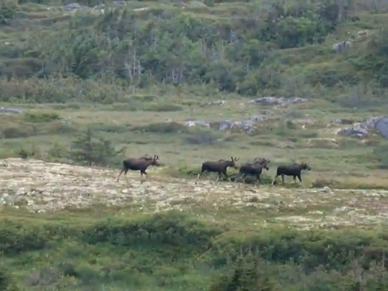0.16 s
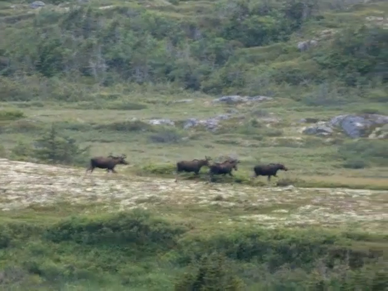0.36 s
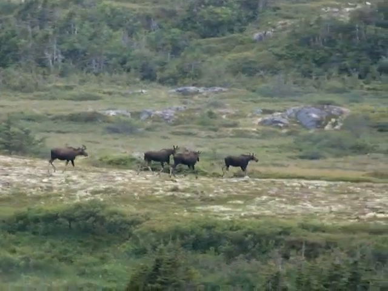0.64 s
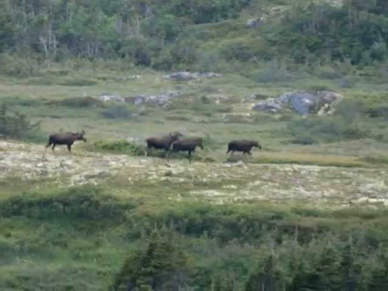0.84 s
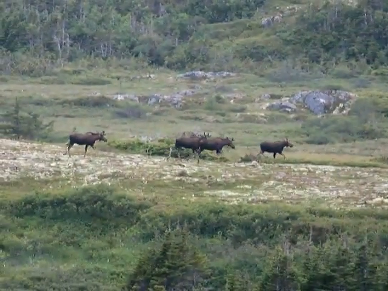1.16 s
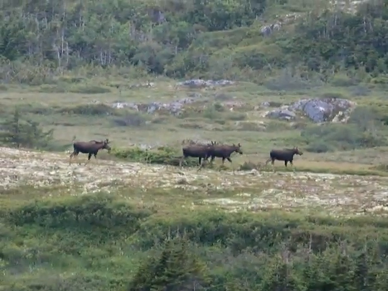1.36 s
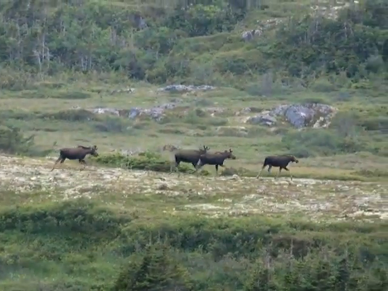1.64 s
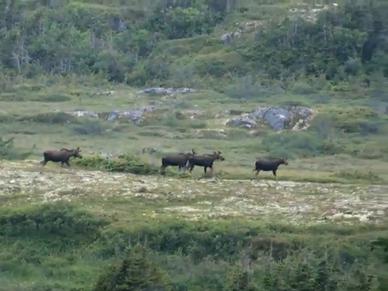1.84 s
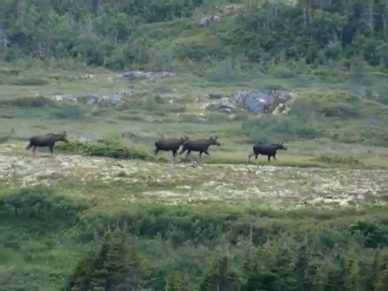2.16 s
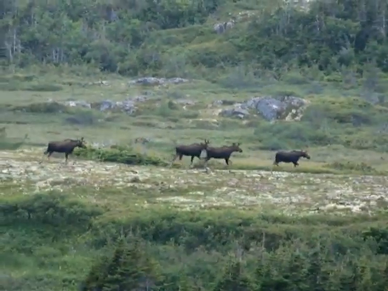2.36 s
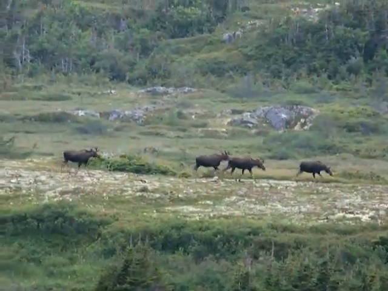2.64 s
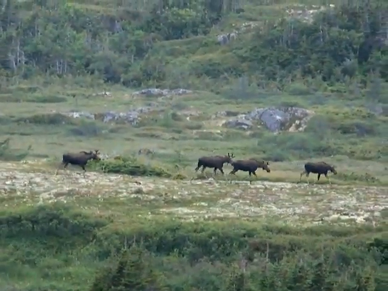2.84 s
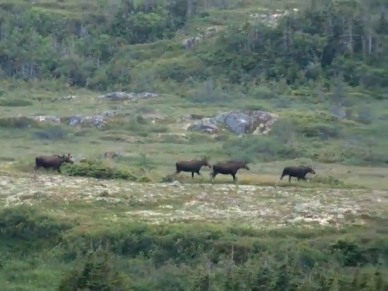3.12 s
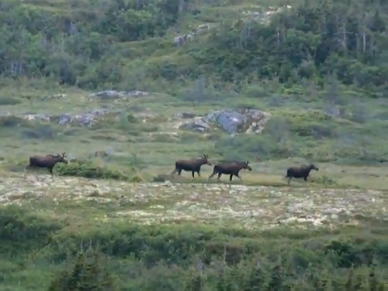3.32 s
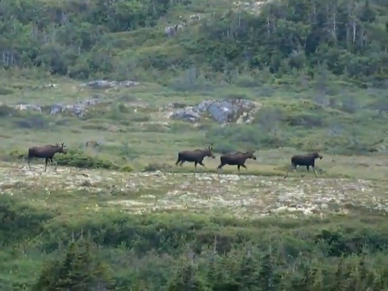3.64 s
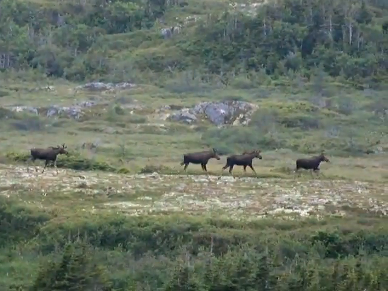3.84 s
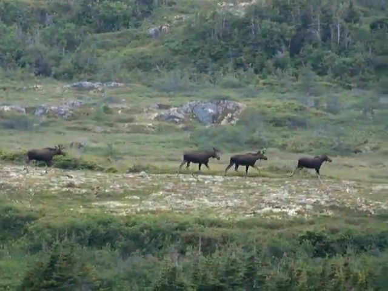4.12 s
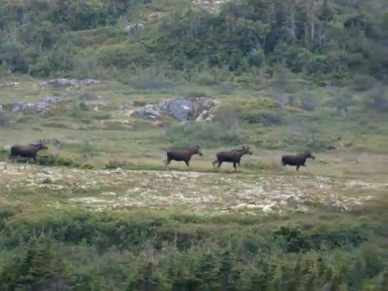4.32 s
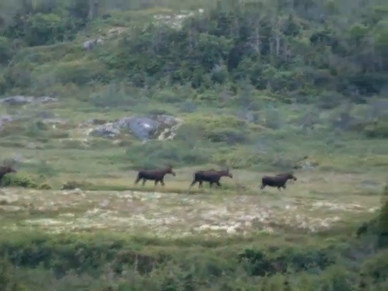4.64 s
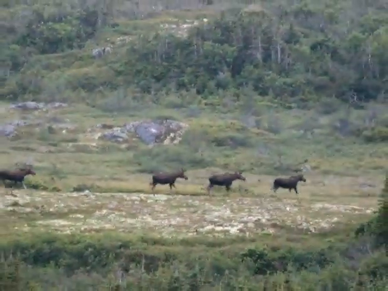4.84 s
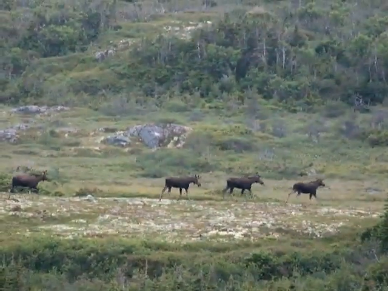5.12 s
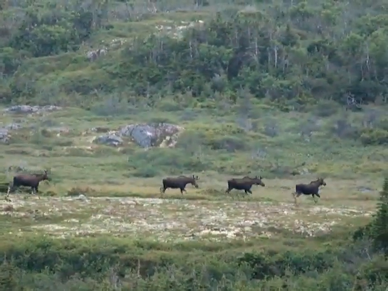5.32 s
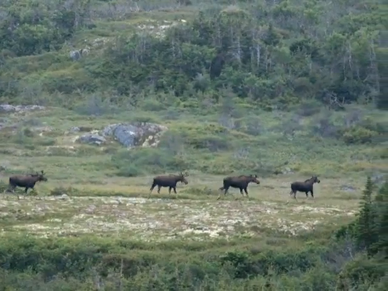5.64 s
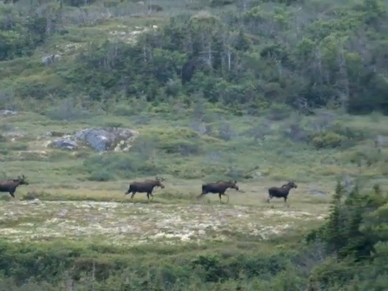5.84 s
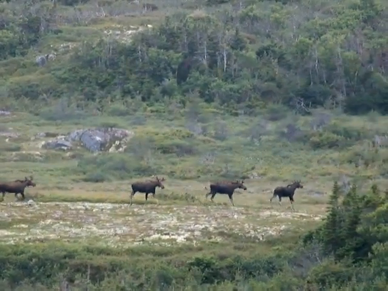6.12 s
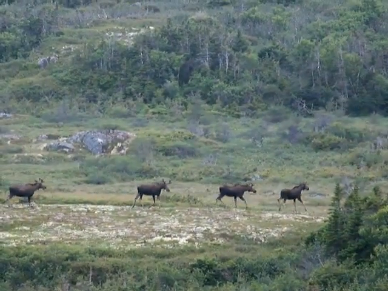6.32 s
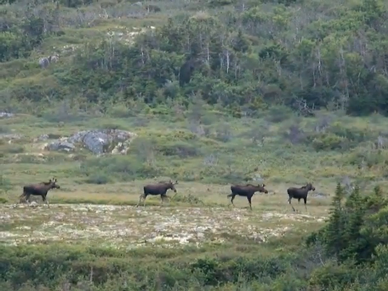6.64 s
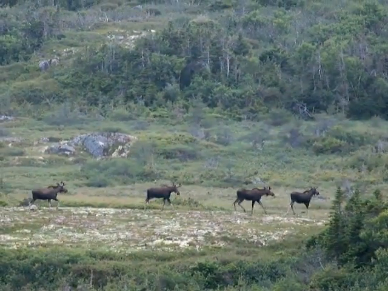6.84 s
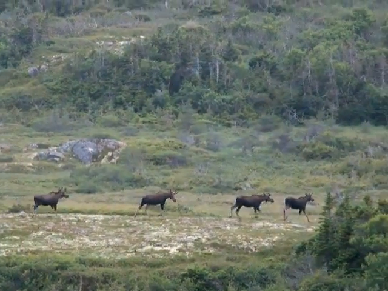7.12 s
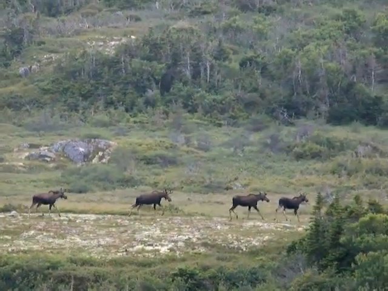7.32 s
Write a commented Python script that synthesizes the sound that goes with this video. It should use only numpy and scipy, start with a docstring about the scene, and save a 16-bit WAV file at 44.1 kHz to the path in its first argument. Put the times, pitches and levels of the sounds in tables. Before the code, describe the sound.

A hand-held camera outdoors hears its own workings, very close. Throughout, its drive gives a steady whirr, a slightly rough mid-pitched hum and a thin, flickering higher whine, over soft hiss and a faint, gusting wind rumble on the microphone. The loudest sound is the focus motor hunting: short, gritty, rattling bursts of about thirty clicks a second, ringing the hollow plastic body. Each lasts roughly a third of a second, opening with a separate click and closing with a softer knock. Bursts come at about 0.7, 1.8, 3.0, 4.2, 4.6, 5.8 and 6.9 seconds, the fourth and fifth nearly joined. The whine swells briefly around 1.8, 2.9 and 5.7 seconds. A few tiny bright ticks are scattered along the way, the clearest near 3.6 seconds. At about 7.3 seconds a hand shifts on the body with soft, dull thumps.

```python
"""Camera hunting for focus

A hand-held camera outdoors hears its own insides. Wind rumbles on the microphone ports over a
steady hiss, and a drive whirrs, hums and whines in the plastic body. About once a second the focus
motor hunts in a burst of short moves, thirty a second, each one ringing the body. There are a few
tiny ticks, and a hand shifts near the end. A limiter rounds the loudest moves."""
import sys
import numpy as np
from scipy import signal
from scipy.fft import rfft, irfft
from scipy.io import wavfile

SR = 44100
rng = np.random.default_rng(int(sys.argv[2]) if len(sys.argv) > 2 else 0)


def transcribe(u):
    """Save the signal u as a 16-bit wav file named by the first command-line argument.

    u: samples, shape (n,) or (channels, n), limited to [-1, 1]; the rate is SR.
    q: integer samples, one column per channel.
    """
    v = np.clip(np.atleast_2d(u).T, -1, 1)
    q = np.round(v * 32767).astype(np.int16)
    wavfile.write(sys.argv[1], SR, q)


N = 329338


def amp(db):
    """Decibels to gain."""
    return 10 ** (np.asarray(db) / 20)


def unit_rms(x):
    """Scale to rms 1."""
    return x / np.sqrt(np.mean(x ** 2) + 1e-20)


def automation(points):
    """Straight lines through (time_s, value) points, at every sample."""
    return np.interp(np.arange(N) / SR, *np.transpose(points))


def drift(rate_hz):
    """Smooth random wander of rms about 1, mostly slower than rate_hz."""
    hop, run_in = 40, 2000
    pole = np.exp(-2 * np.pi * rate_hz * hop / SR)
    noise = rng.standard_normal(N // hop + run_in + 2)
    slow = signal.lfilter([1], [1, -2 * pole, pole * pole], noise)[run_in:]
    return np.interp(np.arange(N) / hop, np.arange(len(slow)), unit_rms(slow))


def pan(db):
    """Left and right gains; a positive pan_db is louder on the left."""
    return amp([[db / 2], [-db / 2]])


def filtered(x, order, hz, kind):
    """Butterworth filter."""
    return signal.sosfilt(signal.butter(order, hz, kind, fs=SR, output="sos"), x)


def ring(force, hz, t60_s, phase=0):
    """One resonance: a unit click starts a dying sine of height 1."""
    r, w = amp(-60 / (t60_s * SR)), 2 * np.pi * hz / SR
    feed = [np.sin(phase), r * np.sin(w - phase)]
    return signal.lfilter(feed, [1, -2 * r * np.cos(w), r * r], force + 1e-18)


# EQ curve of the hiss: freq_hz, gain_db
HISS_EQ = [(1410, -39), (2400, -3.5), (2890, -10), (3490, -9.5), (4360, -10.5), (7400, -17), (8300, -15.5),
           (10800, -57), (18300, -120)]

def microphone_hiss(level_db=-54.5):
    """A steady bed of shaped noise, unrelated in the two channels."""
    hz = np.maximum(np.fft.rfftfreq(N, 1 / SR), 1)
    freq_hz, gain_db = np.transpose(HISS_EQ)
    colour = amp(np.interp(np.log(hz), np.log(freq_hz), gain_db))
    return amp(level_db) * unit_rms(irfft(rfft(rng.standard_normal((2, N))) * colour, N))


# Rise and fall of the wind: time_s, fader_db
GUSTS = [(0, -31), (.15, -34), (.5, -39.5), (1.05, -41), (1.3, -37.5), (1.55, -46.5), (2.75, -47),
         (3.3, -40.5), (3.7, -44.5), (4.7, -38.5), (5.4, -48.5), (5.8, -33.5), (6.2, -46), (6.6, -43.5),
         (7.2, -41.5), (7.47, -32)]

def wind():
    """Lumpy rumble on the two ports, partly shared, stronger on the right."""
    own, shared = rng.standard_normal((2, N)), rng.standard_normal(N)
    lumps = amp([2.5 * drift(6), 2.5 * drift(6)])
    rumble = filtered(lumps * (own + shared), 1, [14, 35], "band")
    rumble = filtered(rumble, 1, 300, "low")
    return amp(automation(GUSTS) + 2.5) * pan(-6) * unit_rms(rumble)


# Resonances of the whirr: pitch_hz, width_hz, gain_db, pan_db, likeness (0 wide, 1 mono)
WHIRR_BANDS = [(405, 80, -25, 0, 0.29), (510, 50.8, 3, 4.5, 1), (610, 67, 0, -9.5, 0.68),
               (755, 35, -11.5, -5.5, 1), (922.4, 106, -1.5, 6, 0.77), (1228, 100, -19, 2, .8),
               (1494, 120, -19.5, 13, 0.9), (1750, 150, -21, 1, .5), (2074, 210, -15, 1, 0.075),
               (3400, 130, -27, 6, .1), (4900, 120, -40.5, 0, 0.11)]

def drive_whirr(gain_db=-39, flicker_db=1.5):
    """Rubbing noise, twice through each resonance; the bands flicker together and a little apart."""
    out, shared_flicker = 0, drift(11)
    for hz, width_hz, db, pan_db, likeness in WHIRR_BANDS:
        t60_s = np.log(1000) / (np.pi * 1.5 * width_hz)
        rubbing = rng.standard_normal((2, N))
        mid, side = unit_rms(ring(ring(rubbing, hz, t60_s), hz, t60_s))
        band = np.sqrt(1 + likeness) * mid + np.sqrt(1 - likeness) * side * [[1], [-1]]
        flicker = shared_flicker + 0.25 * drift(32)
        out = out + amp(db + flicker_db * flicker) * pan(pan_db) * band
    return amp(gain_db) * out


def drive_hum(pitch_hz=634, level_db=-31):
    """The drive's hum: a sine roughened by wobbles in pitch and level."""
    hz = pitch_hz + 4.93 * drift(14.4) + 3.534 * drift(1.51)
    phase = 2 * np.pi * np.cumsum(hz) / SR
    return amp(level_db + 2.7 * drift(9.9)) * pan(-.6) * np.sin(phase + [[1.2], [0]])


# Resting level of the whine: time_s, level_db
WHINE_LEVELS = [(0, -45.5), (1.5, -48), (2.5, -48), (4.2, -50.5), (5.2, -47.5), (5.5, -53), (7.47, -53)]
# Brief swells above it: centre_s, level_db, length_ms
WHINE_SWELLS = [(.33, -34, 17), (1.42, -37, 35), (1.801, -30.5, 57), (2.905, -36, 45), (4.1, -35.5, 28),
                (5.659, -28.5, 33), (5.713, -29.5, 64)]

def drive_whine(pitch_hz=1379):
    """The drive's thin whine; its octave grows with the square of its level."""
    t = np.arange(N) / SR
    phase = 2 * np.pi * np.cumsum(pitch_hz + 9 * drift(25)) / SR
    level = amp(automation(WHINE_LEVELS) + 4.8 * drift(36))
    for centre_s, db, length_ms in WHINE_SWELLS:
        swell = np.exp(-((t - centre_s) * 2000 / length_ms) ** 4)
        level = np.maximum(level, amp(db) * swell)
    height = np.sqrt(2) * level
    tone = height * pan(4.5) * np.sin(phase + [[.9], [0]])
    octave = amp(5.5) * height ** 2 * pan(2.5) * np.sin(2 * phase + [[1.1], [0]])
    return tone + octave


def clicks(cues):
    """A one-sample click for each (start_s, level_db)."""
    track = np.zeros(N)
    for start_s, db in cues:
        track[round(start_s * SR)] = amp(db)
    return track


# Tiny bright ticks: start_s, strength_db
TICK_CUES = [(0.6764, -36), (1.816, -46.5), (2.3166, -37), (3.5273, -39), (3.583, -29.5), (4.2138, -40),
             (7.3074, -33.5)]

def ticks(t60_s=0.026):
    """Each tick is a pinch of bright noise with a fast decay."""
    envelope = signal.lfilter([1], [1, -amp(-60 / (t60_s * SR))], clicks(TICK_CUES))
    return amp(-1.5) * filtered(envelope * rng.standard_normal((2, N)), 2, 4200, "high")


# Bumps of the hand on the body: start_s, strength_db
HAND_BUMPS = [(7.314, -21.5), (7.325, -21.5), (7.373, -24.5)]

def hand_thumps():
    """A hand shifts: soft contacts ring two dull, low resonances."""
    contact = np.hanning(round(0.0027 * SR)) / (0.0021 * SR)
    force = np.convolve(clicks(HAND_BUMPS), contact)[:N]
    return amp(5.5) * (ring(force, 155.6, 0.1) + ring(force, 107, 0.065))


# Runs of evenly spaced focus moves; the last two columns count moves from 0:
# first_s, last_s, mean_db, swing_db, strongest_move, boomiest_move
FOCUS_RUNS = [(0.7693, 0.9015, -3, 5, 1.6, 1.1), (1.9026, 2.0685, -4.5, 5, 1.4, 1.0),
              (3.0691, 3.2355, -4, 5, 1.4, 1.1), (4.3031, 4.4690, -4, 3, 0.4, 0.1),
              (4.6361, 4.8014, -4.5, 2.5, 4.2, 3.8), (5.8362, 6.0019, -3.5, 5, 1.3, 1.0),
              (7.0028, 7.1353, -5, 5.5, 1.5, 0.9)]
# Single moves around the runs, each with a settling knock:
# start_s, strength_db, low_send_db, knock_after_ms, knock_db
SINGLE_MOVES = [(0.687, -2.5, -19, 14.7, -12.5), (0.9664, -16, -2, 12.6, -22),
                (1.8256, -5, -10, 11.5, -14.5), (2.1138, -13, -7, 15, -18.5), (2.9882, -5, -11, 11.2, -13),
                (3.2873, -12, -2.5, 14.2, -16.5), (4.2264, -5, -8, 13.5, -15.5), (4.5622, -10, 0, 14, -31),
                (4.8678, -9, -5, 24.6, -14.5), (5.7568, -6.5, -20, 13, -15.5),
                (6.0481, -13.5, -4.5, 16, -18.5), (6.921, -4.5, -29.5, 16, -15),
                (7.2006, -16.5, -2, 13.8, -27)]

def focus_cues(moves_per_s=29.97, slack_s=0.0015):
    """Every move and knock in order: start_s, strength_db, low_send_db, hollow_send_db."""
    strength_cycle_moves, low_cycle_moves = 7.3, 5.16   # both wax and wane along a run
    cues = []
    for first_s, last_s, mean_db, swing_db, strongest, boomiest in FOCUS_RUNS:
        k = np.arange(round((last_s - first_s) * moves_per_s) + 1)
        start_s = np.linspace(first_s, last_s, len(k))
        start_s[0] -= slack_s   # the first move sets off early
        db = mean_db + swing_db * np.cos(2 * np.pi * (k - strongest) / strength_cycle_moves)
        low_db = -13.5 + 4.5 * np.cos(2 * np.pi * (k - boomiest) / low_cycle_moves)
        hollow_db = -7.5 + 0.19 * db   # follows the strength only in part
        cues += zip(start_s, db, low_db - db, hollow_db - db)   # sends are relative to the strength
    for start_s, db, low_send_db, knock_after_ms, knock_db in SINGLE_MOVES:
        cues.append((start_s, db, low_send_db, -2))
        cues.append((start_s + knock_after_ms / 1000, knock_db, 1.5, -3.5))
    return sorted(cues)


def motor_strokes(cues, step_ms=2.79, jitter_ms=0.05, grit_fade_ms=4.13):
    """Stereo force of each move: a few motor steps, with bright gear grit between and after them."""
    t_ms = np.arange(SR // 30) / SR * 1000
    start_s, strength_db = np.transpose(cues)[:2]
    gap_s = np.diff(start_s, prepend=0)
    slack = (gap_s > .05) & (gap_s < .1)
    weakness_db = np.clip(-strength_db - 6.5, 0, 8)
    stroke_ms = 5.08 + 1.15 * slack + 0.3 * weakness_db   # slack and weak moves take longer
    timing_ms = jitter_ms * rng.standard_normal((len(cues), 8))
    noise = rng.standard_normal((len(cues), 3, len(t_ms)))
    grit = filtered(noise[:, :1] + 2.3 * noise[:, 1:], 3, 2500, "high")   # shared + each port's own
    attack = np.clip(t_ms / 0.94, 0, 1)
    release = np.exp(-np.maximum(t_ms - stroke_ms[:, None], 0) / grit_fade_ms)
    strokes = amp(-19) * (attack * release)[:, None] * grit
    for stroke, late_ms, length_ms in zip(strokes, timing_ms, stroke_ms):
        at_ms = np.abs(np.arange(8) * step_ms + late_ms)
        build_up = np.clip(0.43 + at_ms / 7.5, 0, 1)
        stop = np.clip(length_ms - at_ms + .5, 0, 1)
        stroke[:, (at_ms * SR / 1000).astype(int)] -= build_up * stop
    return strokes


# Modes of the plastic body: pitch_hz, gain_db, t60_s, pan_db, left_lead_rad
BODY_MODES = [(186, -8, 0.025, 3.5, 0.2), (381.2, 8, 0.098, 3.5, 0.22), (539, 0, 0.073, -1.5, 0.18),
              (912, 8.5, 0.044, 4.5, 1.08), (1002.6, 5, 0.029, 4, 0.55), (1119, -0.5, 0.044, -6, 1.88),
              (1258, 5, 0.041, 0.5, 2), (1480, -2, .03, 4.0, .3), (1795, -1, .02, 5.0, 0),
              (2296, -10, 0.0068, 8.5, 5), (2657, -12.5, 0.012, 4.5, 4), (3440, -17.5, 0.0066, -3, -1.04),
              (4490, -24.5, 0.008, -9.5, 0.5), (5460, -36, 0.0064, -9.5, 13), (7940, -23.5, 0.0027, -7, 11)]

def focus_motor(low_top_hz=450, hollow_top_hz=1350):
    """The moves ring the body modes; the slow low modes feel each move as one push."""
    cues = focus_cues()
    strokes = motor_strokes(cues)
    push = np.append(np.zeros(round(0.00253 * SR)), np.hanning(round(0.00044 * SR)))   # a little late
    push = -push / push.sum()
    uneven_db = 1.32 * rng.standard_normal((len(cues), len(BODY_MODES)))   # no two moves strike alike
    out = 0
    for k, (hz, gain_db, t60_s, pan_db, lead_rad) in enumerate(BODY_MODES):
        is_low_ring, is_hollow = k == 1, low_top_hz < hz < hollow_top_hz
        force = np.zeros((2, N + SR))
        for (start_s, db, low_db, hollow_db), stroke, chance_db in zip(cues, strokes, uneven_db[:, k]):
            send_db = low_db if is_low_ring else hollow_db if is_hollow else 0
            blow = push if hz < low_top_hz else stroke
            at = round(start_s * SR)
            force[:, at:at + blow.shape[-1]] += amp(db + send_db + chance_db) * blow
        left, right = force[:, :N] * (-1) ** max(k, 1)   # neighbouring upper modes swing opposite ways
        mode = [ring(left, hz, t60_s, lead_rad / 2), ring(right, hz, t60_s, -lead_rad / 2)]
        out = out + amp(gain_db - 6.5) * pan(pan_db) * mode
    softened = filtered(out, 1, 6000, "low")   # contacts are not quite hard
    return filtered(softened, 3, 105, "high")


def scene():
    """The mix at the two ports: focus motor in front, drive, hiss and wind behind."""
    foreground = focus_motor() + ticks() + hand_thumps()
    drive = drive_whirr() + drive_hum() + drive_whine()
    return foreground + drive + microphone_hiss() + wind()


def record(dry):
    """Gain control ducks after loud moves, the highest peaks are rounded off, the top is cut."""
    threshold_db, recovery_db_per_s, stopband_hz = -12, 60, 8900
    peak_db = 20 * np.log10(np.abs(dry).max(axis=0) + 1e-9)
    over_db = np.maximum(peak_db - threshold_db, 0)
    fall_db = recovery_db_per_s * np.arange(N) / SR
    held_db = np.maximum.accumulate(over_db + fall_db) - fall_db
    smoothed_db = signal.lfilter([.002], [1, -.998], held_db)
    ducked = dry * amp(-.15 * smoothed_db)
    rounded = ducked / (1 + ducked ** 4) ** .25
    return signal.sosfilt(signal.cheby2(10, 45, stopband_hz, fs=SR, output="sos"), 0.92 * rounded)


dry = scene()
out = record(dry)
transcribe(out)
```